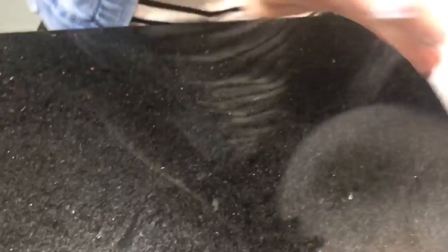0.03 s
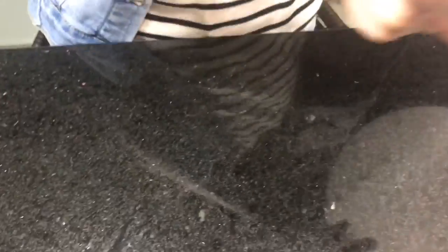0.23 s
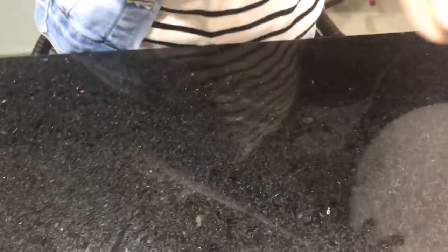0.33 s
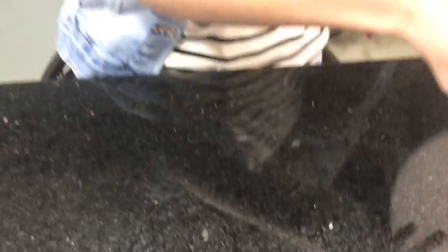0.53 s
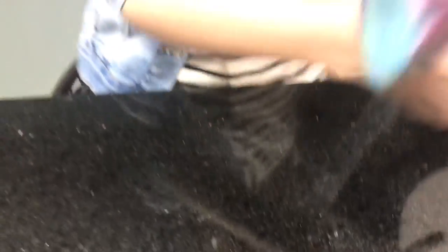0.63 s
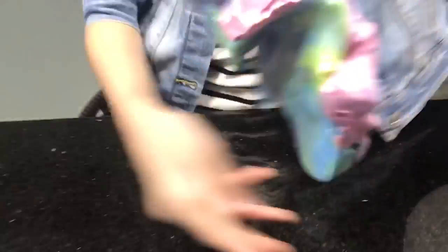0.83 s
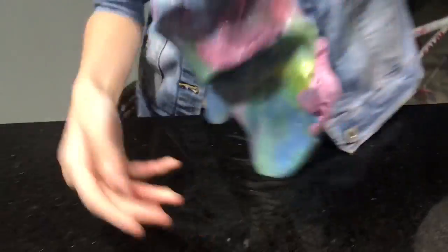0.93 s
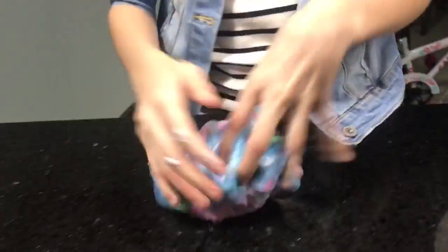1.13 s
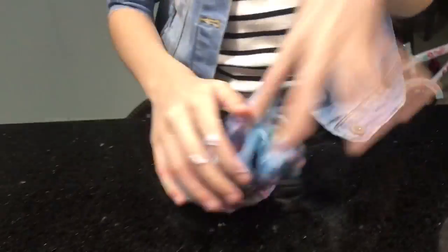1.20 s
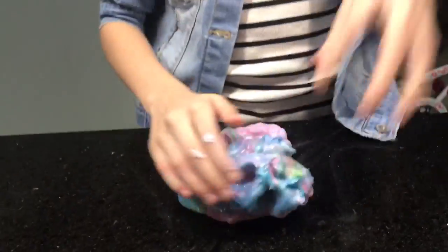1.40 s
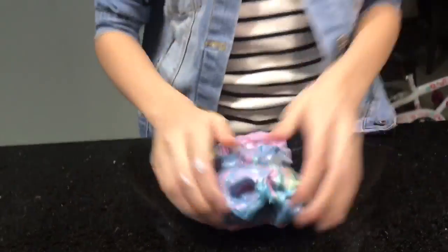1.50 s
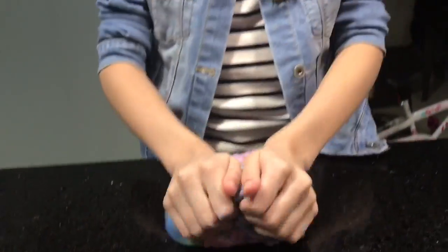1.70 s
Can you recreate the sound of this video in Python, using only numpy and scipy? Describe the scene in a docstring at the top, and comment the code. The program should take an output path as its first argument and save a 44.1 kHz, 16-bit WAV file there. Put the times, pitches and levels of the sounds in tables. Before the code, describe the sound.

Wet slime is squeezed by hand close to the microphone, starting with faint sticky ticks and a loud cluster of bubble pops at 0.2 seconds. More sharp pops come from 0.5 to 0.7 seconds, then softer ones. At about 1.2 seconds the lump slaps a hard table, and quick pops and bead clicks follow until 1.5 seconds as fingers press in. The room rings briefly after each pop.

```python
"""A lump of beaded slime, squeezed by hand, lifted, set down on a hard table and pressed into.
Each trapped air pocket cracks open and rings, its pitch dropping as the hole widens; beads and sticky
film tick, the lump slaps the table, and a little air hisses out from under the fingers.
The microphone is a phone, close to the hands, in a live room that hums on after every pop.
Its limiter holds down the loudest peaks."""
import sys
import numpy as np
from scipy import signal
from scipy.fft import rfft, irfft
from scipy.io import wavfile
from scipy.ndimage import uniform_filter1d, minimum_filter1d

SR = 44100
rng = np.random.default_rng(int(sys.argv[2]) if len(sys.argv) > 2 else 0)


def generate_wav(sig):
    """Save sig (samples, or channels by samples) to the path in sys.argv[1] as 16-bit PCM at SR."""
    pcm = np.round(np.clip(np.atleast_2d(sig).T, -1, 1) * 32767).astype(np.int16)
    wavfile.write(sys.argv[1], SR, pcm)


N = 77175

# Beads and sticky film ticking. Each row: start in seconds, level in dB.
TICK_EVENTS = [(.003, -27), (0.0282, -37), (.039, -56), (.058, -34.5), (.074, -57), (0.0973, -34.5),
               (1.131, -38.5), (1.16, -42), (1.176, -39), (1.183, -34), (1.1868, -33), (1.1983, -32),
               (1.206, -40), (1.3391, -34), (1.4566, -38), (1.516, -41.5), (1.5653, -42.5), (1.7363, -37.5)]
# Fine crackle of film peeling off the skin. Each row: time in seconds, level in dB.
PEEL_LEVEL = [(0, -39), (.05, -47), (.1, -52), (.14, -74), (.5, -58), (.72, -57), (.9, -55.5), (1.11, -59),
              (1.14, -60), (1.2, -48), (1.25, -52), (1.44, -66), (1.52, -62), (1.62, -90), (1.75, -64)]
# Tone of the ticks and of that crackle. Each row: frequency in Hz, gain in dB.
TICK_TONE = [(500, -22), (2000, -14), (4500, 2), (9000, -5.5), (13000, -8.5), (16000, -7)]
PEEL_TONE = [(500, -3.5), (2200, 7.5), (4000, -14), (6000, -7), (8500, -8), (16000, -25)]
# How hard the hands squeeze. Each row: time in seconds, gain of the small bubbles in dB.
SQUEEZE_EFFORT = [(0, -39), (.16, -65), (.3, -26.5), (.48, -31.5), (.62, -42), (.74, -30.5), (.87, -33.5),
                  (.92, -25), (1.1, -45.5), (1.15, -35), (1.19, -48), (1.25, -25.5), (1.39, -29),
                  (1.54, -31), (1.62, -42), (1.75, -40.5)]
# Air pockets bursting. Each row: start in seconds, ring level in dB, crack level in dB,
# final pitch in Hz, opening time in ms, ring decay in ms.
POP_EVENTS = [(.1788, -26.5, -45, 680, 0.8, 1.1), (.191, -26, -39, 576, 0.85, 5.1),
              (.2022, 2, -5.5, 1003, 0.88, 0.73), (0.2047, 1.5, -5, 468, 0.51, 2.1),
              (0.2093, 1, -22, 649, 0.54, 3.3), (.217, -2.5, -17, 489, 0.71, 2.13),
              (.5357, 3.5, -12, 455, 1., 1.26), (.645, 2, -14, 536, 0.97, 1.37),
              (.677, 0, -12.5, 485, 0.92, 0.79), (0.6964, -4.5, -48, 484, 0.77, 1.16),
              (.7115, -5, -25.5, 547, 0.68, 1.45), (.7232, -11, -48, 528, 0.72, 2.5),
              (.7895, -15.5, -61, 510, 0.572, 2), (.807, -11, -43, 542, 0.47, 2.9),
              (.82, -15, -55, 600, 0.75, 1.4), (.9295, -13, -50, 515, 0.97, 3.1),
              (0.947, -13, -52, 603, 0.75, 2.9), (1.03, -18.5, -42.5, 473, 0.62, 1.8),
              (1.042, -17, -42, 483, 0.75, 1.5), (1.1242, -11.5, -46, 554, 0.62, 3.7),
              (1.129, -26, -38, 311, 0.65, 7.2), (1.139, -14.5, -34, 605, 0.8, 8.9),
              (1.209, -15.5, -52, 1192, .7, 3.4), (1.2135, -6, -19.5, 610, 1., 2.05),
              (1.2262, -6, -53, 537, 0.756, 3.6), (1.2945, -8, -45, 540, 0.78, 2.1),
              (1.3286, -13, -47, 544, 0.46, 2.9), (1.3665, -20, -52, 550, 0.624, 3.2),
              (1.4182, -1, -23, 542, 0.84, 0.97), (1.427, -6, -28, 552, 0.68, 2.8),
              (1.4343, -17.5, -31, 546, 0.69, 2.8), (1.4692, -4.5, -29, 572, 0.76, 1.1),
              (1.478, -11, -31, 650, 0.82, 0.4), (1.488, -12.5, -45, 528, .7, 3.3),
              (1.4955, -15.5, -53, 533, 0.37, 2.6), (1.515, -31, -54, 495, .6, 1.8)]
# Tone of the film cracking, then flapping wetly. Each row: frequency in Hz, gain in dB.
CRACK_TONE = [(300, 11.5), (1500, 11.5), (3800, 7), (6000, -1.5), (8000, -9), (10500, -15.5),
              (13000, -17.5), (16000, -14)]
SMACK_TONE = [(300, -19), (850, 2), (1250, 13), (1700, -3.5), (2150, 12), (2850, 6.5), (3150, -5.5),
              (3750, 3.5), (4500, -15.5), (6200, -9), (8000, -26), (16000, -51)]
# Tone of the slap on the table and of the escaping air. Each row: frequency in Hz, gain in dB.
SPLAT_TONE = [(150, -8), (500, -9), (1200, 15), (1700, 17.5), (2200, 16), (2800, -1), (3500, 8.5),
              (4200, -12), (4900, 8), (6500, -2.5), (8500, 1), (10400, -6), (12000, -2), (14000, -9),
              (16000, -16)]
HISS_TONE = [(3000, -19), (5500, -2), (7500, 9), (9500, -14), (16000, -26)]
# The room's diffuse tail. Each row: band frequency in Hz, level in dB, seconds to fade by 60 dB.
TAIL_BANDS = [(59, 2, 0.67), (128, -5.5, 1), (288, 1, 0.57), (417, -7, 0.33), (695, -2.5, 0.45),
              (833, -12.5, 0.32), (1120, -3.5, 0.38), (1580, -7.5, 0.58), (2400, -4.5, 0.43),
              (3200, -7.5, 0.49), (6040, -7.5, 0.43), (10900, -3.5, 0.3), (15000, -7, 0.21)]
# The room's standing waves. Each row: frequency in Hz, level in dB, seconds to fade by 60 dB.
STANDING_WAVES = [(163.8, 6.5, 0.44), (218.9, 7, 0.84), (258.7, 3.5, 0.97), (313, 6, 0.36),
                  (421.3, 3.5, 0.13), (478.7, 2.5, 0.14), (509, -7, 0.7), (528, -10, 1), (567, -6.5, 1),
                  (681.6, -0.5, 0.38), (711, 8, 0.33), (1007, -8, .4), (1220, -15, 0.48), (2232, 3, 0.13)]
# Near reflections. Each row: delay in seconds, level in dB.
REFLECTIONS = [(.0063, -13), (.0088, -19), (0.0172, -21.5)]
# Tone of the reflections, the indoor air and the microphone. Each row: frequency in Hz, gain in dB.
REFLECTION_TONE = [(200, -0.5), (1500, -1), (4000, -2), (8000, -8), (16000, -5)]
AIR_TONE = [(25, 7), (60, 20), (100, -0.5), (200, -9), (600, -16), (1000, 2.5), (2200, -12.5),
            (4000, -16.5), (8000, -32.5), (16000, -28)]
MIC_TONE = [(25, -76), (60, -2.5), (120, -3), (250, 11), (700, -0.5), (900, -4), (1600, -1), (2300, 2),
            (5000, 0), (16000, 5.5)]


def undb(db):
    """Decibels to gain."""
    return 10 ** (np.asarray(db) / 20)


def curve(rows):
    """Gain over time from points in seconds and dB."""
    return undb(np.interp(np.arange(N) / SR, *np.array(rows).T))


def add(out, at_s, sound):
    """Mix a sound in at a given time."""
    start = int(np.clip(round(at_s * SR), 0, N - 1))
    out[start:start + len(sound)] += sound[:N - start]


def colour(x, points):
    """Minimum-phase filter through points in Hz and dB."""
    size = 2 * N
    hz, db = np.array(points).T
    log_hz = np.log(np.arange(N + 1) * SR / size + 1)
    gain = undb(np.interp(log_hz, np.log(hz), db))
    cepstrum = irfft(np.log(gain))
    cepstrum[1:N] *= 2
    cepstrum[N + 1:] = 0
    return irfft(rfft(x, size) * np.exp(rfft(cepstrum)))[:N]


def snap(decay_s, size=2048, passes=3):
    """A burst of noise that dies at once, evened out so that no pitch stands out."""
    envelope = np.exp(-np.arange(size) / SR / decay_s)
    burst = rng.standard_normal(size) * envelope
    for _ in range(passes):
        spectrum = rfft(burst)
        burst = irfft(spectrum / (np.abs(spectrum) + 1e-12)) * envelope ** .25
    return burst * np.linalg.norm(envelope) / np.linalg.norm(burst)


def ticks(grain_samples=20, grain_spread_db=7.5):
    """Beads click and sticky film lets go of the fingers, over the fine crackle of its peeling."""
    clicks = np.zeros(N)
    for at_s, db in TICK_EVENTS:
        add(clicks, at_s, undb(db) * snap(decay_s=.0013))
    grains = rng.standard_normal(N)
    grain_db = grain_spread_db * np.minimum(rng.standard_normal(N), 2)
    grains *= undb(np.repeat(grain_db, grain_samples)[:N])
    crackle = colour(grains / grains.std(), PEEL_TONE) * curve(PEEL_LEVEL)
    return colour(clicks, TICK_TONE) + crackle


def pocket(final_hz, open_ms, decay_ms, size=3000):
    """An air pocket opens: its wall swings ever wider and slower as the hole grows, then settles."""
    tear_hz, overtone_ratio, overtone_db, thud_ms = 2637, 2.099, -15.5, .32
    ms = np.arange(size) / SR * 1000
    closed = np.exp(-ms / open_ms)
    phase_step = 2 * np.pi * (final_hz + (tear_hz - final_hz) * closed) / SR
    phase = np.cumsum(phase_step)
    since_open_ms = ms - 2.76 * open_ms
    swell = (1 - closed) ** 2.46
    fade = 1 / np.sqrt(1 + np.exp(np.minimum(2 * since_open_ms / decay_ms, 100)))
    overtone = undb(overtone_db) / overtone_ratio * np.cos(overtone_ratio * phase)
    flow = swell * fade * (np.cos(phase) + overtone) / phase_step
    # Escaping air gives one soft push, stronger from larger, lower pockets.
    thud = (1 - closed) * np.exp(-(since_open_ms / thud_ms) ** 2)
    thud_db = -13 - 28 * np.log2(max(final_hz / 512, 1))
    return -undb(1) * np.gradient(flow) - undb(thud_db) * thud


def bubbles(per_s=130, centre_hz=568, spread_db=3):
    """Small muffled bubbles give way at random, louder the harder the hands squeeze."""
    out = np.zeros(N)
    for slot, (jitter, strength, pitch) in enumerate(rng.standard_normal((400, 3))):
        at_s = (slot + jitter / 2) / per_s
        if 0 < at_s < N / SR:
            ring = pocket(centre_hz * np.exp(.18 * pitch), open_ms=.5355, decay_ms=1.55)
            add(out, at_s, undb(spread_db * strength) * ring)
    return out * curve(SQUEEZE_EFFORT)


def pops():
    """Large pockets burst. Returns the rings with the smack of flapping wet film, and the cracks."""
    rings, cracks, smacks = np.zeros((3, N))
    for at_s, ring_db, crack_db, final_hz, open_ms, decay_ms in POP_EVENTS:
        add(rings, at_s, undb(ring_db) * pocket(final_hz, open_ms, decay_ms))
        add(cracks, at_s, undb(crack_db) * snap(decay_s=.00065))
        smack_db = (ring_db + crack_db) / 2 - 11
        add(smacks, at_s, undb(smack_db) * snap(decay_s=.0062))
    return rings + colour(smacks, SMACK_TONE), colour(cracks, CRACK_TONE)


def splat(at_s=1.2137):
    """The wet lump slaps the hard table."""
    out = np.zeros(N)
    add(out, at_s, undb(-11.5) * snap(decay_s=.0014))
    return colour(out, SPLAT_TONE)


def hiss(peak_s=1.5, width_s=.031):
    """Air escapes through a narrow fold as the fingers press in, swelling and fading."""
    swell = np.exp(-((np.arange(N) / SR - peak_s) / width_s) ** 2)
    return undb(-51.5) * swell * colour(rng.standard_normal(N), HISS_TONE)


def room(x, build_s=.0058):
    """The live room answers: a diffuse tail that dulls as it fades, standing waves, near reflections."""
    t = np.arange(N) / SR
    hz, db, t60 = np.array(TAIL_BANDS).T
    noise = rfft(rng.standard_normal(N))
    log_hz = np.log(np.arange(len(noise)) * SR / N + 1)
    build_up = 1 - np.exp(-(t / build_s) ** 2)
    response = np.zeros(N)
    for share, band_db, band_t60 in zip(np.eye(len(hz)), db, t60):
        band = irfft(noise * np.interp(log_hz, np.log(hz), share), N)
        fade = np.exp(-np.log(1000) * t / band_t60) * build_up
        response += undb(band_db) * fade / np.linalg.norm(fade) * band
    for mode_hz, mode_db, mode_t60 in STANDING_WAVES:
        decay_rate = np.log(1000) / mode_t60
        hum = np.exp(-decay_rate * t) * np.sin(2 * np.pi * mode_hz * t)
        response += undb(mode_db) * 2 * decay_rate / SR * hum
    near = np.zeros(N)
    for delay_s, echo_db in REFLECTIONS:
        add(near, delay_s, undb([echo_db]))
    return signal.fftconvolve(x, response + colour(near, REFLECTION_TONE))[:N]


def scene(crack_send_db=-7, splat_send_db=-1.5, air_db=-51):
    """The slime close up, with the room and its quiet indoor air behind it."""
    rings, cracks = pops()
    slime = rings + bubbles() + ticks() + hiss()
    landing = splat()
    reverb = room(slime + undb(crack_send_db) * cracks + undb(splat_send_db) * landing)
    air = colour(rng.standard_normal(N), AIR_TONE)
    return (slime + cracks + landing + reverb + undb(air_db) * air / air.std())[None]


def record(dry):
    """The phone, in mono: it thins the deep bass, limits the peaks and cuts the top."""
    limit_db, hold_s, top_hz = -.45, .0027, 16000
    mic = colour(dry[0], MIC_TONE)
    hold = int(hold_s * SR)
    needed_gain = 1 / np.maximum(np.abs(mic) / undb(limit_db), 1)
    smooth_gain = uniform_filter1d(minimum_filter1d(needed_gain, hold), hold)
    lowpass = signal.ellip(8, .2, 70, top_hz, fs=SR, output="sos")
    return signal.sosfilt(lowpass, mic * smooth_gain)[None]


dry = scene()
out = record(dry)
generate_wav(out)
```